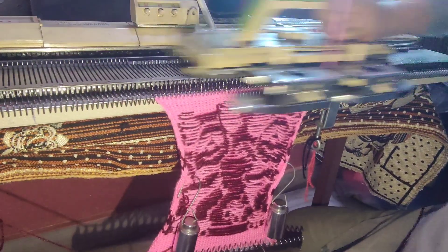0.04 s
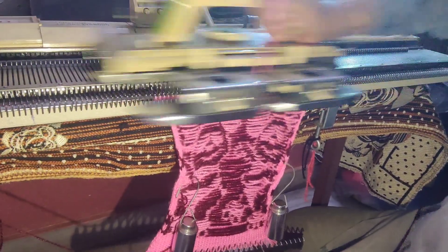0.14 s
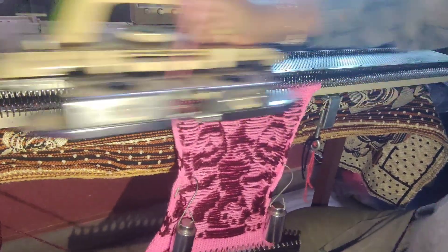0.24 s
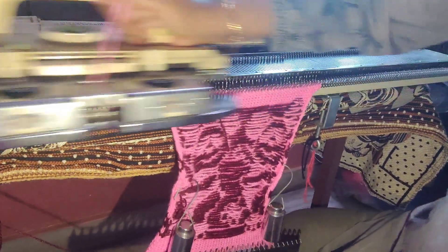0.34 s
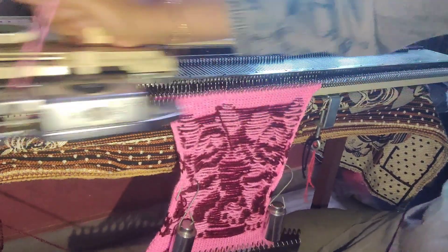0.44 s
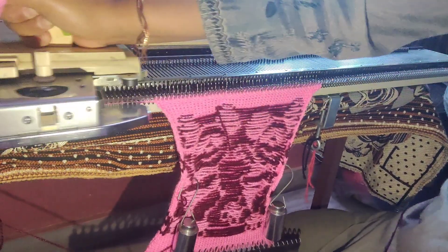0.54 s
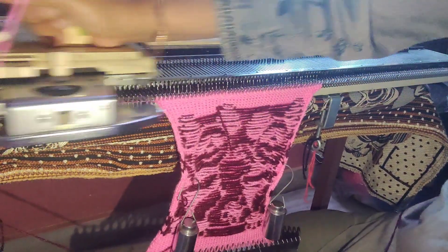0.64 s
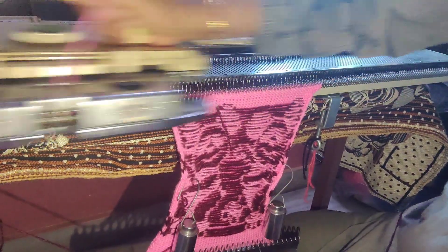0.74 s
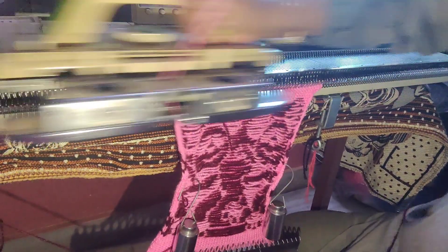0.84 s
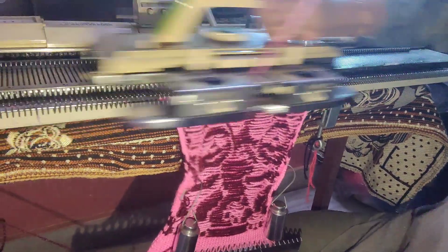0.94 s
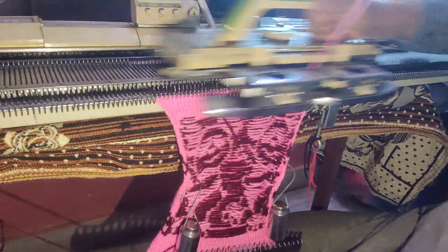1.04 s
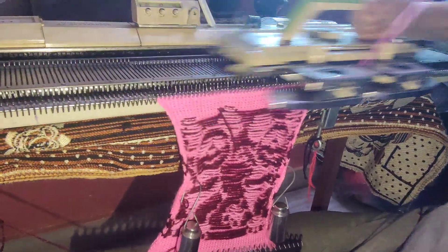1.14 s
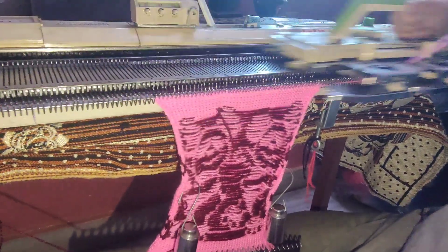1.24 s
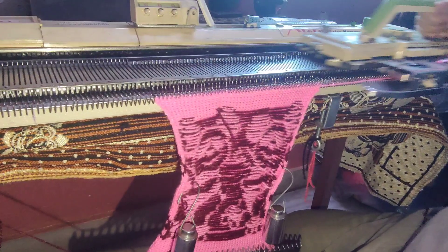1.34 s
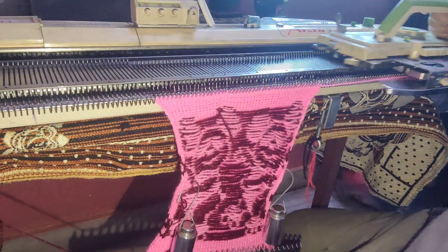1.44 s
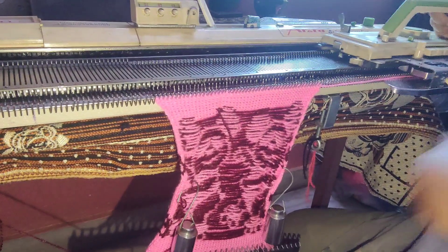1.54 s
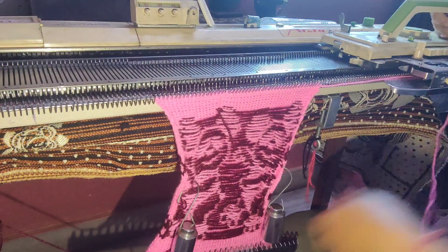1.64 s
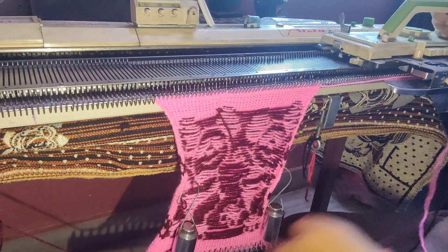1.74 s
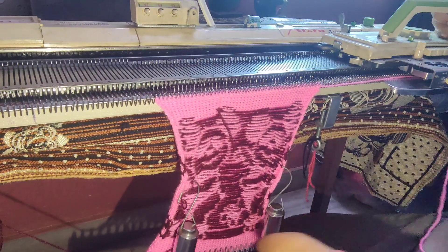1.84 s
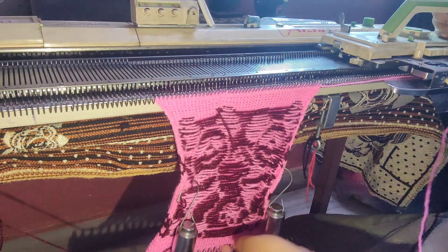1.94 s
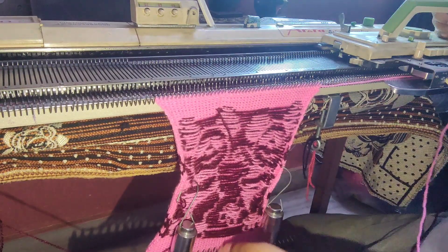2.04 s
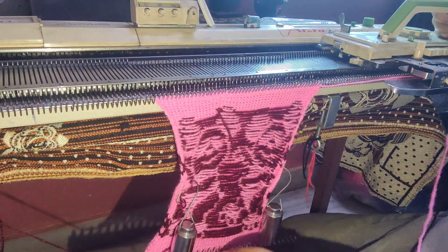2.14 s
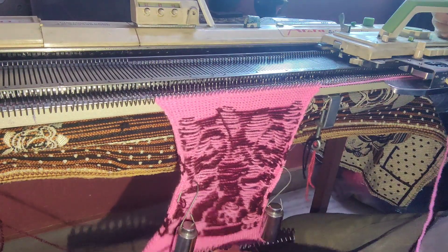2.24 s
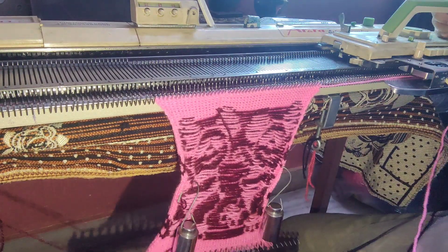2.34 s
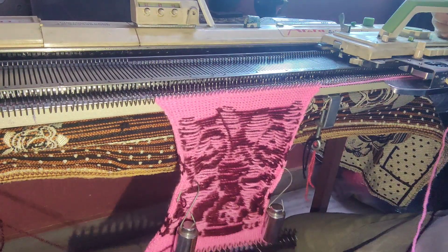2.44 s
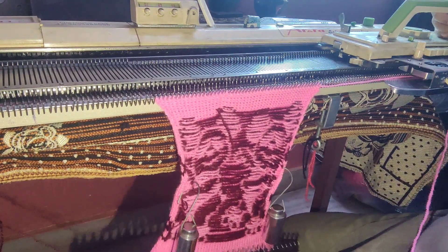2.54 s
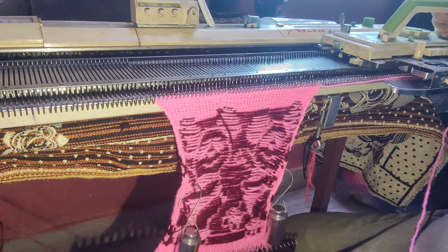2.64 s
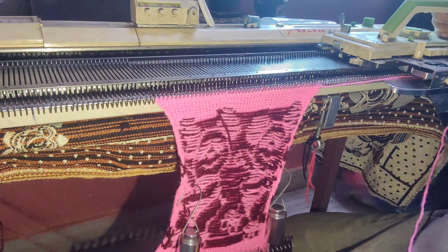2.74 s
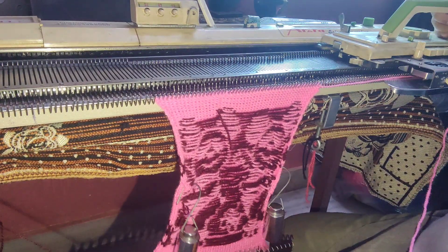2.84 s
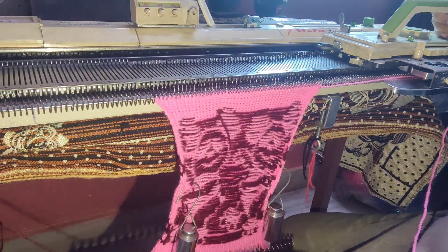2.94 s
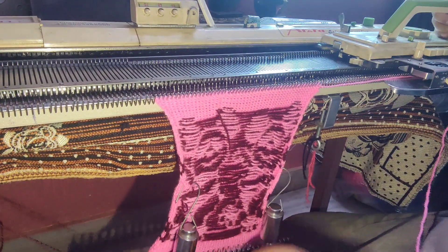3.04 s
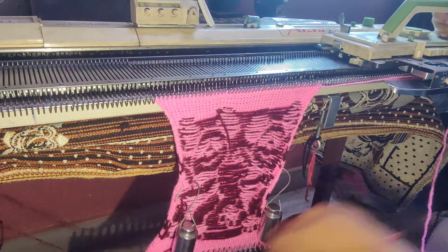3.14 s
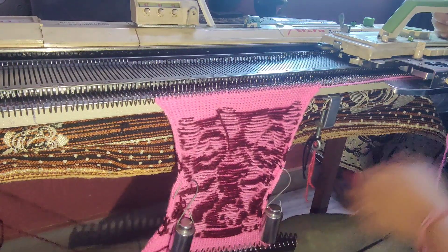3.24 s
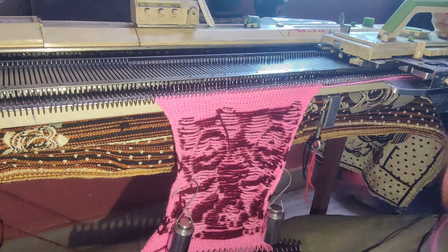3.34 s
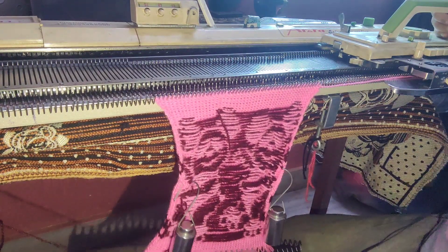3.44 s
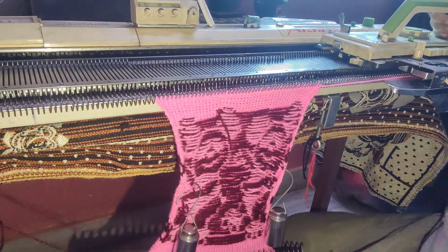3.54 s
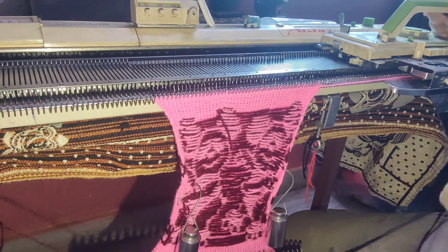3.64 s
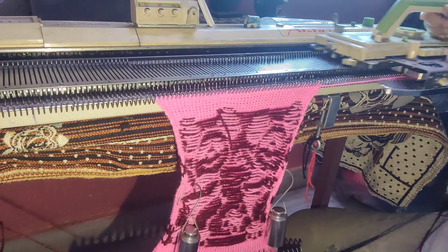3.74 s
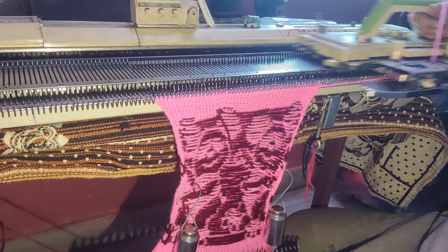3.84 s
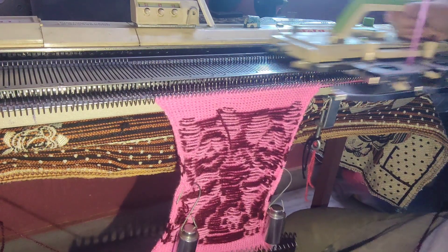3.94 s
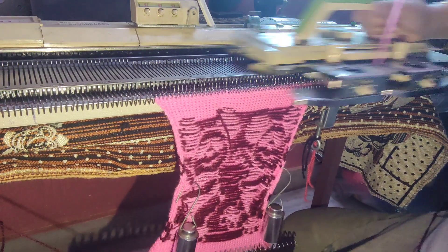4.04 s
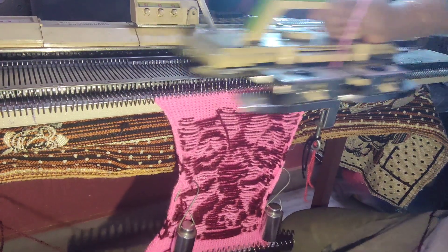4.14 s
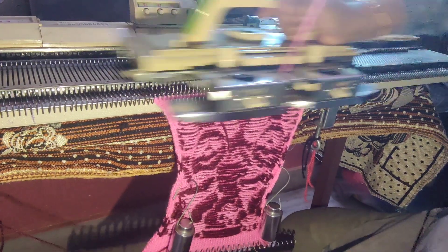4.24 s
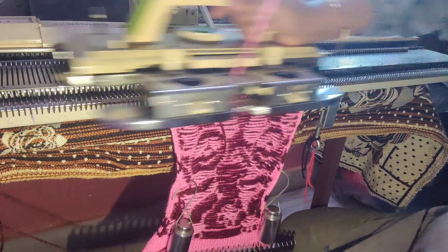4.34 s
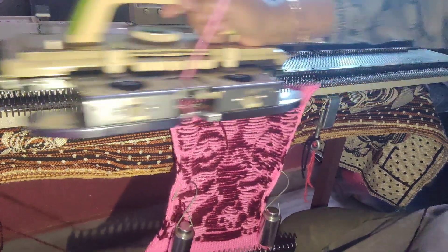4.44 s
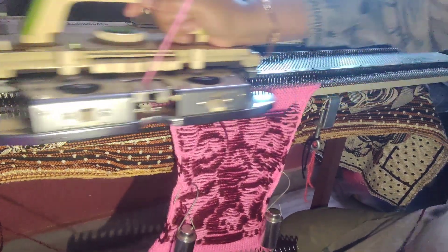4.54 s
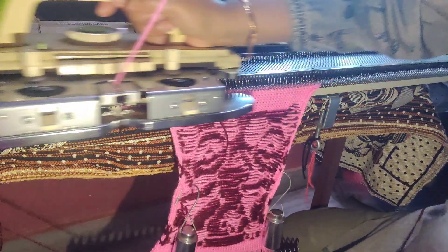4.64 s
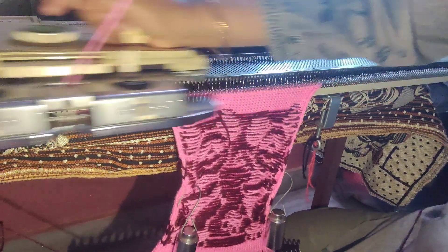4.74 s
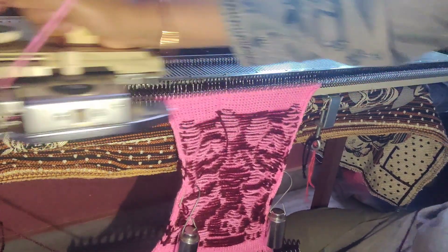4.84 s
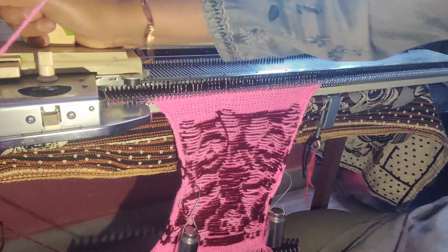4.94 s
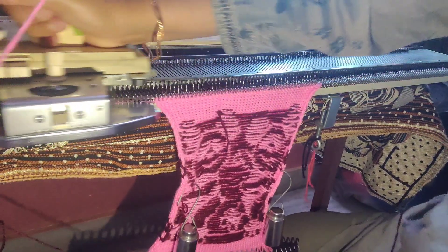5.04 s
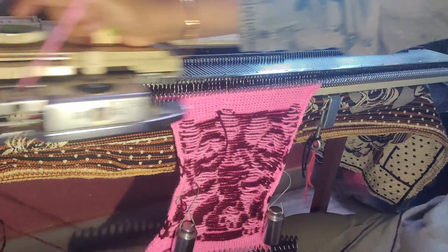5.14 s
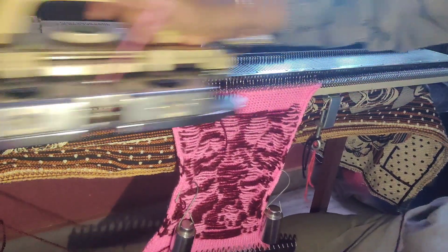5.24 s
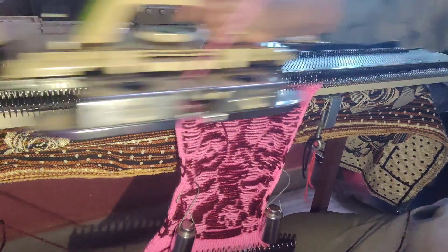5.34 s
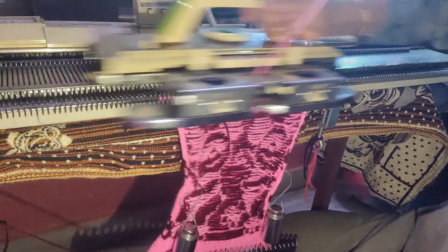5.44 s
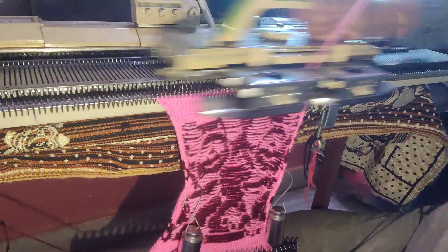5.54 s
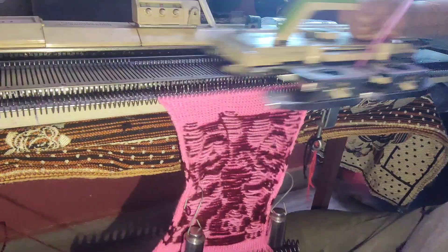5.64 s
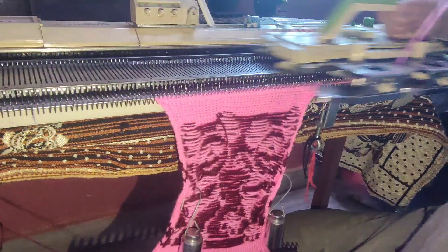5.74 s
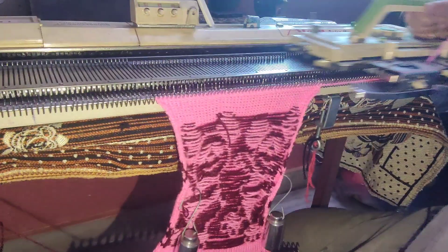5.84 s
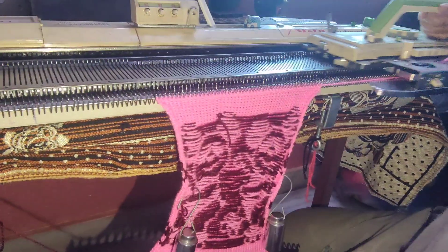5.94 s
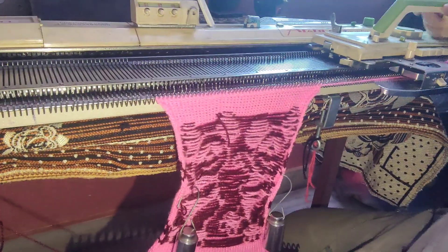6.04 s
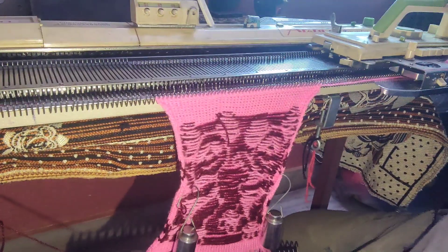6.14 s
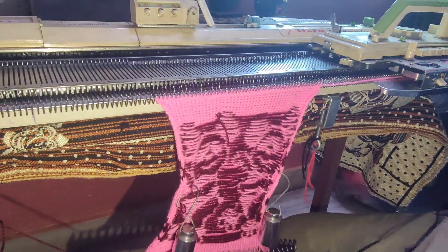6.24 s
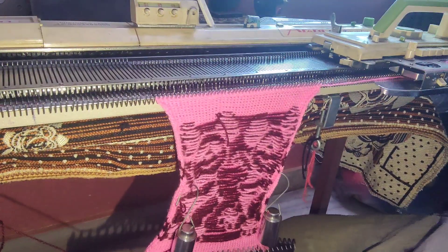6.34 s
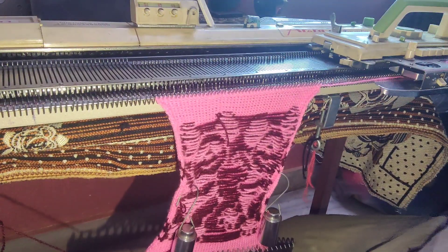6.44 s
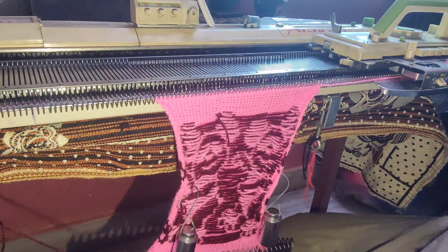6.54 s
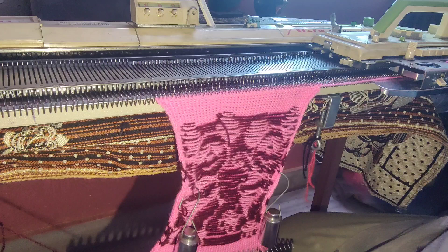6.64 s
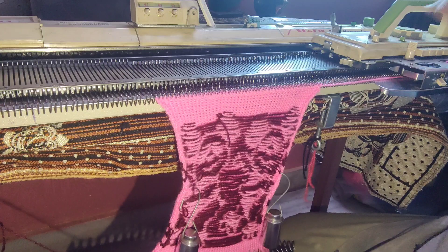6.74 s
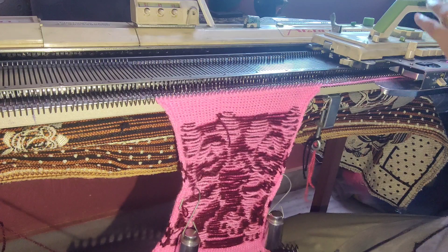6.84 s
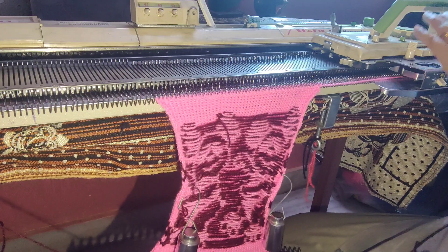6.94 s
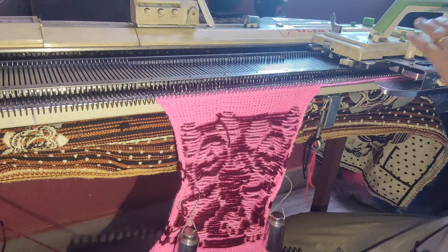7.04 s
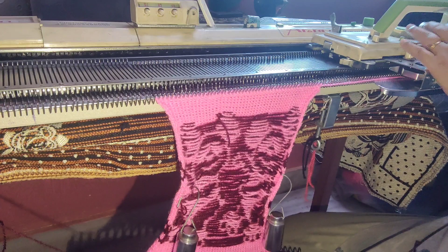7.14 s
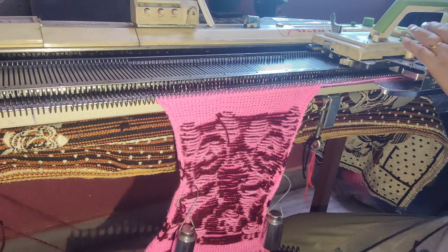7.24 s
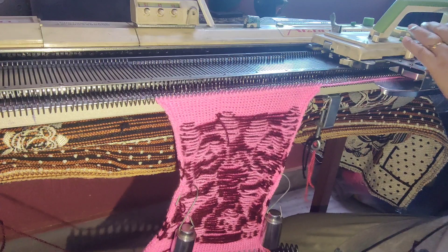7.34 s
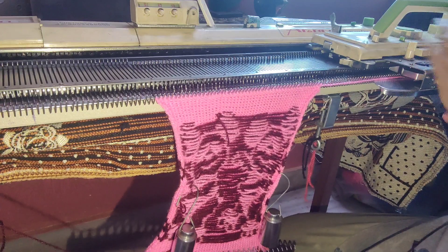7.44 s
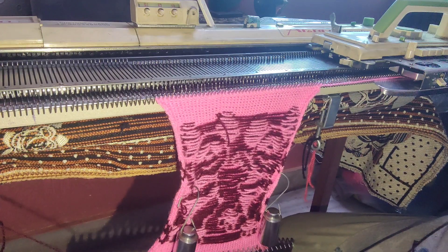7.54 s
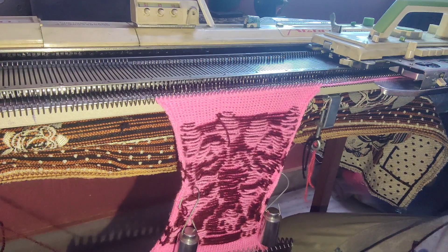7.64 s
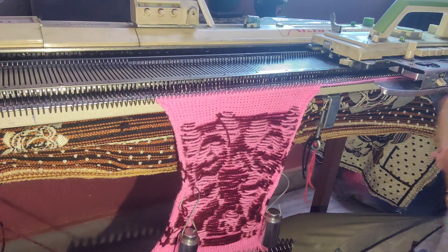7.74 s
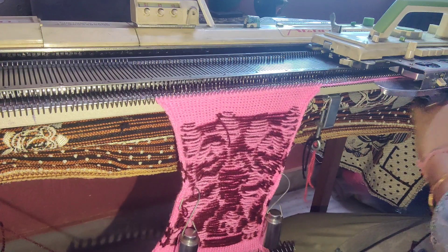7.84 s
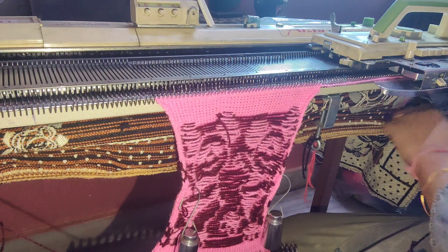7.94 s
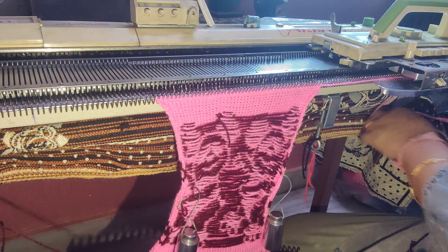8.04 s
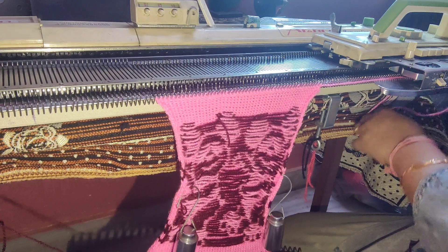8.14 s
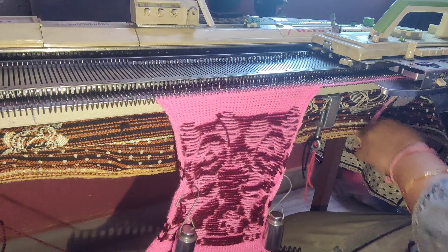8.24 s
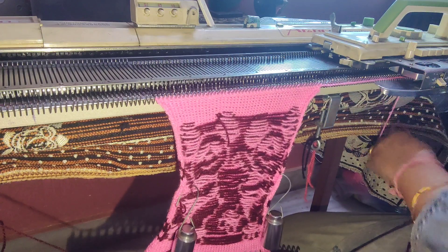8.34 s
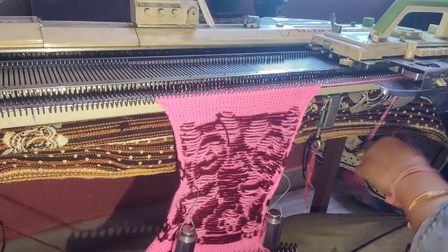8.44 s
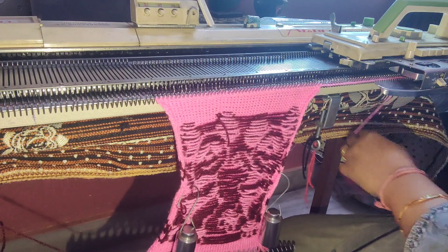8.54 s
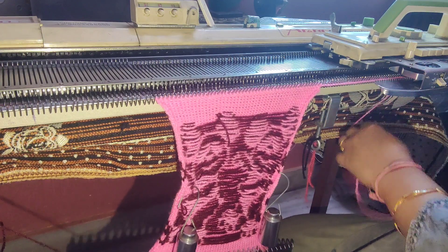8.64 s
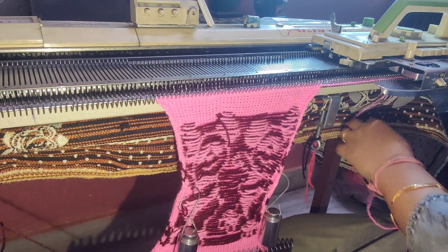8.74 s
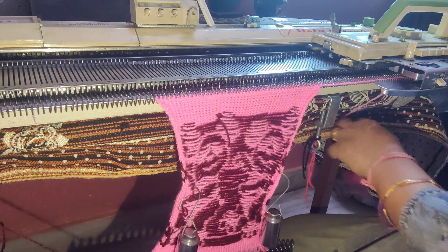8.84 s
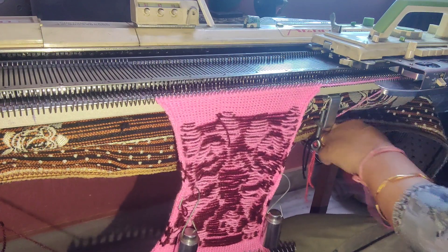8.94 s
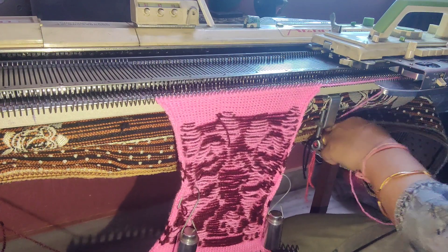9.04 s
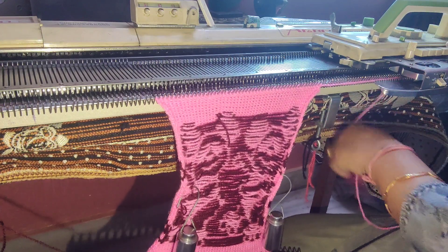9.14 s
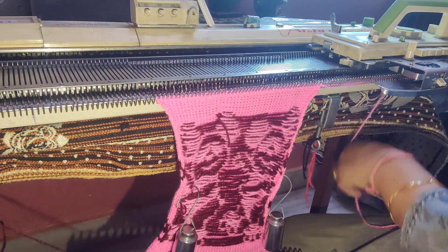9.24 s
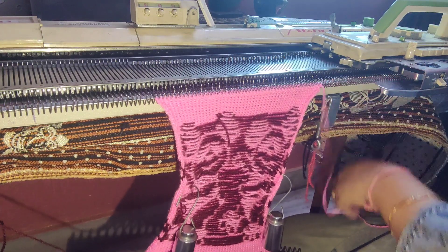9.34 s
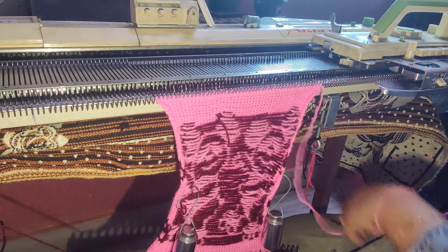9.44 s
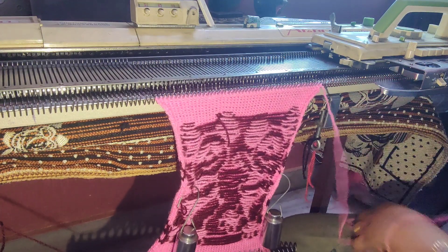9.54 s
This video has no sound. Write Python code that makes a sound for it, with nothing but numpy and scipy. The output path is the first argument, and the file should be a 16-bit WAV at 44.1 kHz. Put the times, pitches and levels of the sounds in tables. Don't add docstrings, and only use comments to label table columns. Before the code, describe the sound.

Close, dry metallic whirrs of a hand-pushed knitting machine sweep over and back, pause, repeat with clicks and tiny squeaks, followed by two sharp lever snaps.

```python
import sys
import numpy as np
from scipy import signal
from scipy.io import wavfile
from scipy.ndimage import uniform_filter1d

SR = 44100
rng = np.random.default_rng(int(sys.argv[2]) if len(sys.argv) > 2 else 0)


def master_out(mix):
    frames = np.transpose(np.atleast_2d(mix))
    ceiling = np.clip(frames, -1, 1)
    pcm = np.round(ceiling * 32767).astype(np.int16)
    wavfile.write(sys.argv[1], SR, pcm)


def voltage_ratio(decibels):
    exponent = np.asarray(decibels, float) / 20
    return 10 ** exponent


N = 422478
HZ = np.fft.rfftfreq(8192, 1 / SR)
CLICK_MS = 2.8

# (frequency [Hz], width [Hz], level [dB])
CASE_MODES = [(60, 68, -3.5), (142, 19, 8.5), (407, 81, -3), (630, 31, -0.5), (1070, 800, -11)]


def evened(x):
    return x / np.sqrt(np.mean(x ** 2) + 1e-20)


def read(points, hz):
    f, value = np.transpose(points)
    return np.interp(np.log(hz + 1), np.log(f + 1), value)


def add(mix, s, sound):
    part = mix[round(s * SR):][:len(sound)]
    part += sound[:len(part)]


def bumps(peaks, hz):
    return sum(voltage_ratio(db) ** 2 / (1 + (2 * (hz - f) / width) ** 2) for f, width, db in peaks)


def dips(valleys, hz):
    return np.prod([1 - depth * np.exp(-((hz - f) / width) ** 2) for f, width, depth in valleys], axis=0)


def causal(gain):
    log_gain = np.log(np.maximum(np.r_[gain, gain[-2:0:-1]], 1e-5))
    return np.fft.ifft(np.exp(np.conj(signal.hilbert(log_gain)))).real[:len(gain) // 2]


def coloured(x, gain):
    return signal.oaconvolve(x, causal(gain))[:len(x)]


def band(x, lo_hz, hi_hz):
    return signal.sosfilt(signal.butter(8, [lo_hz, hi_hz], "bandpass", fs=SR, output="sos"), x)


def ring(modes, fuzz):
    t = np.arange(round(0.4 * SR)) / SR
    drift = evened(uniform_filter1d(rng.standard_normal((len(modes), len(t))), 300))
    waver = (1 + fuzz * drift) * (1 - np.exp(-t / 0.00069))
    return sum(w * voltage_ratio(db - 60 * t / t60) * np.sin(2 * np.pi * f * t)
               for (f, db, t60), w in zip(modes, waver))


def crack(envelope, gain):
    sound = signal.oaconvolve(envelope * rng.standard_normal(len(envelope)), causal(gain)[:2048])
    return sound / abs(sound).max()


def click(t, low_db, top_db, hz, ms):
    blow = (1 - np.exp(-t / 0.00083)) * np.exp(-1000 * t / ms)
    centre = crack(blow, bumps([(hz, 2600, 0)], HZ) / (1 + (HZ / 7900) ** 16))
    body_gain = np.sqrt(bumps([(2300, 1800, -0.5), (3760, 760, -4.0)], HZ))
    body = crack(blow, body_gain / (1 + (1100 / (HZ + 1)) ** 4))
    top = crack(blow ** 2, 1 / (1 + (8000 / (HZ + 1)) ** 16) / (1 + (HZ / 13000) ** 4))
    return centre + voltage_ratio(low_db + 1.0) * body + voltage_ratio(top_db + 2.5) * top


def levels(*laws):
    # (time [s], speed of needle knocks [dB], hand weight on the bed [dB])
    strokes = [
        [(0.0, -58, 1), (0.048, -56, -1), (0.082, -39, -3.5), (0.112, -32, 1.5), (0.218, -23, -3.5),
         (0.35, -25.5, 1), (0.465, -38.5, 6.5), (0.554, -54, 5.5), (0.62, -58, 2.5)],
        [(0.886, -42, -1), (0.926, -30.5, 3), (0.97, -24.5, -1.5), (1.04, -25.5, 1), (1.232, -31.5, 1),
         (1.3, -41.5, 3), (1.384, -52, 0.5), (1.594, -73.5, 1), (1.75, -95.5, 8.5)],
        [(4.164, -54.5, 6), (4.185, -34, -4), (4.224, -29.5, 1), (4.298, -25, -3.5), (4.39, -28.5, 1),
         (4.528, -31.5, 2.5), (4.62, -35.5, 3), (4.714, -42.5, 5.5), (4.79, -52, 8.5)],
        [(5.337, -43, -4.5), (5.382, -33.5, 0), (5.468, -26.5, -1), (5.515, -29.5, 2), (5.584, -27, 0),
         (5.678, -27, -0.5), (5.79, -39.5, 6), (5.96, -60, -0.5), (6.25, -93, 7)],
    ]
    # (time [s], speed [dB], hand weight [dB])
    turns = [
        [(0.72, -68, 2.5), (0.872, -57.5, -2)],
        [(3.78, -91.5, 1), (3.81, -85.5, -1.5), (3.826, -68, 5), (3.976, -63.5, 1), (4.138, -57, -2)],
        [(4.858, -52, 2), (4.99, -58, 0), (5.118, -64.5, 1), (5.29, -59, -2.5), (5.33, -56.5, -1)],
    ]
    full_speed_db = -25
    s, speed_db, weight_db = np.array(sorted(row for path in strokes + turns for row in path)).T
    t = np.arange(N) / SR
    resting = np.r_[np.diff(s) > 1, True][np.searchsorted(s, t, "right") - 1]
    speed_db = np.interp(t, s, speed_db) - full_speed_db
    weight_db = np.interp(t, s, weight_db)
    return [~resting * voltage_ratio(db + by_speed * speed_db + by_weight * weight_db)
            for db, by_speed, by_weight in laws]


def patchy(x):
    z = signal.stft(x, nperseg=512)[2]
    patches = rng.standard_normal(z.shape[::-1]).T
    patches = uniform_filter1d(uniform_filter1d(patches, size=5, axis=0), size=12, axis=1)
    patch_db = 1.4 * evened(patches)
    return signal.istft(z * voltage_ratio(patch_db), nperseg=512)[1][:N]


def needle_knocks():
    # (time [s], level [dB])
    surges = [(0.122, -0.9), (0.141, -1.1), (0.213, 1.2), (0.341, -1.5), (0.366, 1.94), (0.379, -2),
              (0.416, -0.15), (0.941, -0.7), (1.013, 0), (1.055, 1.2), (1.079, -1.3), (1.118, -1.6),
              (1.18, 0.5), (1.256, 0.04), (4.307, 1.1), (4.437, -0.9), (5.445, -0.55), (5.469, 0.6),
              (5.519, -1.6), (5.644, -1.76), (5.675, 1.03), (5.701, -2), (5.748, -0.26)]
    knocks_per_s, surge_s = 5000, 0.009
    impacts = rng.choice([-1., 1.], N) * (rng.random(N) < knocks_per_s / SR)
    knocks = evened(impacts) + 0.7 * rng.standard_normal(N)
    knocks *= voltage_ratio(0.3 * evened(uniform_filter1d(rng.standard_normal(N), 500)))
    near = np.arange(-1000, 1000)
    for s, db in surges:
        knocks[round(s * SR) + near] *= voltage_ratio(1.3 * db * np.exp(-(near / SR / surge_s) ** 2))
    return knocks


def carriage():
    # (start [s], [(frequency [Hz], width [Hz], level [dB])])
    bed_modes = [
        (0, [(450, 40, -1), (654, 81, -4), (940, 33, -9), (1133, 28, -0.5), (1950, 100, -8.5), (1512, 32, -1.5), (2355, 150, -1), (3000, 300, -9), (3520, 470, -6), (4030, 60, -1.5), (4500, 68, -7)]),
        (.8, [(561, 150, -10), (1094, 72, -1.5), (1237, 70, -7), (2950, 150, -8.5), (3927, 300, -8.5), (1509, 59, -4.5), (2388, 110, 0.5), (3430, 130, 0), (4480, 110, -8)]),
        (3.001, [(329, 39.4, -13.5), (443.2, 50, -5.5), (562.5, 110, -3.5), (845, 60, -6.5), (1175, 130, -2.5), (3030, 300, -7), (3900, 300, -5.5), (4700, 300, -8.5), (1521, 52, -0.5), (2014, 75, -4.5), (2425, 120, -3), (3472, 260, -2), (4383, 49, -3.5)]),
        (5.201, [(490, 80, -9), (631, 117, -5), (2020, 142, -7), (1150, 186, -5), (1540, 68, -5), (2460, 250, -2), (3430, 155, 0), (4000, 109, -1.5), (4450, 94, -6)]),
    ]
    # (frequency [Hz], density [dB per Hz])
    rasp = [(120, -39.5), (200, -6.5), (286, -15), (497, 0), (762, -11), (1140, 0), (1380, -8),
            (1520, -4.5), (1700, -3), (2360, -6), (5400, -6), (7020, -36), (11900, -120)]
    # (frequency [Hz], density [dB per Hz])
    sheen = [(2350, -39), (4000, -6), (5130, -10.5), (6250, 1.5), (6510, 3.5), (7400, -3.5), (8070, -11.5),
             (12500, -17), (15200, -20.5), (15700, -18)]
    # (frequency [Hz], width [Hz], depth [0-1])
    valleys = [(1390, 58, .65), (1700, 170, 0.7), (5000, 300, .1)]
    knocks = needle_knocks()
    base = voltage_ratio(read(rasp, HZ) - 4.5) ** 2
    strokes = np.split(knocks, [round(s * SR) for s, _ in bed_modes[1:]])
    bed = np.concatenate([evened(coloured(stroke, np.sqrt(bumps(peaks, HZ) + base)))
                          for stroke, (_, peaks) in zip(strokes, bed_modes)])
    steel = patchy(coloured(knocks * rng.choice([-1., 1.], N), voltage_ratio(read(sheen, HZ))))

    singing = np.minimum(levels((0, 0.2, 0))[0], 1)
    bed = singing * bed + (1 - singing) * evened(coloured(knocks, np.sqrt(base)))
    bed = patchy(coloured(bed, dips(valleys, HZ)))

    parts = [band(steel, 4900, 7900), band(steel, 7900, 17000), band(bed, 800, 5000), band(bed, 240, 800)]
    gains = levels((-26, 1, 0), (-30, 1.24, 0.58), (-29, 0.9, 0.88), (-39.5, 0.73, 1.2))
    return sum(gain * evened(part) for gain, part in zip(gains, parts))


def table_boom():
    # (frequency [Hz], width [Hz], level [dB])
    table_modes = [(134.4, 11, -3), (162, 9.8, 0), (196.1, 38, -10.5)]
    # (time [s], boom [dB], rocking [dB])
    jolts = [(0.07, -49, -74), (0.23, -50, -76), (0.47, -43, -66), (1.06, -46.5, -73), (1.28, -47, -63),
             (3.85, -62, -64), (4.25, -44.5, -69), (4.4, -46, -52), (4.54, -47, -47), (4.65, -46.5, -49),
             (4.81, -43, -60), (4.96, -64, -67), (5.06, -61.5, -80), (5.18, -58.5, -67), (5.369, -50, -84),
             (5.48, -58, -60), (5.6, -39, -74), (5.77, -41.5, -59)]
    rise_db_per_s, fall_db_per_s = 199.5, 109.5
    rocking_modes = [(62.5, 14, -0.29), (101, 44, -1.7)]
    boom = coloured(rng.standard_normal(N), bumps(table_modes, HZ) ** 0.75)
    rocking = coloured(rng.standard_normal(N), bumps(rocking_modes, HZ))
    gains = np.array(levels((-50, 0.45, 0.51), (-72, 0.43, 0.5)))
    t = np.arange(-SR // 2, SR) / SR
    jolt = voltage_ratio(np.minimum(rise_db_per_s * t, -fall_db_per_s * t))
    shaken = np.zeros((2, N + SR // 2))
    for s, *dbs in jolts:
        for row, db in zip(shaken, dbs):
            add(row, s, (voltage_ratio(db) * jolt) ** 2)
    gains = np.sqrt(gains ** 2 + shaken[:, SR // 2:])
    return gains[0] * evened(boom) + gains[1] * evened(rocking)


def moans():
    # (time [s], length [s], frequency [Hz], level [dB])
    notes_held = [
        (4.165, 0.18, 172, -33),
        (0.2, .07, 220, -46),
        (5.57, 0.13, 130, -42.5),
        (0.03, .11, 165, -40),
        (4.3, 0.03, 183, -51),
        (4.7, .035, 160, -59),
    ]
    out = np.zeros(N)
    for s, length, hz, db in notes_held:
        t = np.arange(round(length * SR)) / SR
        swell = np.sin(np.pi * (t / length) ** 1.5)
        add(out, s, voltage_ratio(db) * swell * np.sin(2 * np.pi * hz * t))
    return out


def cam_clicks():
    # (time [s], peak [dB], low part [dB], top part [dB], pitch [Hz])
    strikes = [(0.072, -43.5, -12, 0, 7000), (0.0823, -35, -10.5, -7.5, 6340),
               (0.4737, -19.5, -21.5, -12, 6860), (0.5677, -32.5, -5, -9, 6360),
               (0.609, -41.5, -9.5, -10, 6900), (0.629, -46, -1, -10, 6700), (0.8814, -34, -0.5, -15, 7140),
               (0.906, -33, -1, -10.5, 6460), (1.2813, -21, -5.5, -7, 6900), (3.8295, -59.5, 2, -21, 5640),
               (4.172, -24, -15, -12, 6370), (4.583, -21.5, -13, -5, 6600), (5.3357, -40.5, 1, -5, 7640),
               (5.3436, -38.5, -1.5, -20, 7350), (5.6797, -18.5, -10, -14.5, 6150),
               (5.7903, -23, -13, -5, 7300)]
    out, t = np.zeros(N), np.arange(1500) / SR
    for s, db, low_db, top_db, hz in strikes:
        add(out, s, voltage_ratio(db + 1.0) * click(t, low_db, top_db, hz, CLICK_MS))
    return out


def scuffs():
    # (time [s], peak [dB], pitch [Hz], duration [ms], width [Hz])
    catches = [
        (0.472, -22.5, 6900, 4, 1588),
        (3.829, -53, 5570, 5, 900),
        (3.954, -52.5, 6700, 6, 1500),
        (3.959, -42, 6700, 6.01, 900),
        (4.096, -43.5, 6800, 5, 899),
        (5.2274, -47, 5990, 3, 3000),
        (5.3375, -39.5, 7180, 7, 2000),
        (5.6727, -17, 6500, 7, 1800),
        (1.051, -18.5, 6500, 6, 2026),
    ]
    out, t = np.zeros(N), np.arange(1500) / SR
    for s, db, hz, ms, width in catches:
        gain = bumps([(hz, width, 0), (2400, 1500, -12), (11000, 6000, -24)], HZ)
        add(out, s, voltage_ratio(db) * crack(t * np.exp(-2000 * t / ms), gain))
    return out


def latches():
    # (time [s], peak [dB], pitch [Hz], plate ring [dB], latch ring [dB])
    drops = [
        (4.8248, -21, 7600, -59, -25.5),
        (4.9638, -28, 6200, -42.5, -27),
        (5.0516, -31, 6300, -48.5, -32),
        (5.168, -39.5, 6620, -53.5, -37),
    ]
    # (frequency [Hz], width [Hz], level [dB])
    latch_modes = [
        [(2270, 190, -9), (3180, 290, -9), (3690, 140, -14), (5200, 190, -14), (5670, 120, -10), (6490, 150, 2),
         (7700, 230, 4), (9900, 290, -11)],
        [(1154, 270, -6), (2430, 110, -2), (3226, 110, -2), (4700, 190, -11), (5560, 200, -2), (6200, 100, 0),
         (7180, 180, -10), (8200, 310, -11)],
        [(2403, 130, -2.5), (3270, 120, -1), (3720, 110, -8), (4550, 280, -8), (6050, 280, -3),
         (9200, 130, -14), (10600, 240, -13), (11620, 210, -15)],
        [(1150, 170, -10), (2400, 95, -3), (3220, 170, -4), (4870, 300, -12), (5490, 160, 1), (6480, 180, 3),
         (8100, 110, -12), (8970, 230, -3)],
    ]
    # (frequency [Hz], level [dB], t60 [s])
    plate_modes = [(1130, -10, 0.13), (1223, -3, 0.12), (1515, -5, .12), (2010, -1.5, 0.13),
                   (2182, -5.5, .09), (2320, -3.5, 0.1), (2530, -6.5, .11), (3265, -12.5, .06),
                   (3526, -11, 0.061), (5730, -4.5, .12)]
    # (frequency [Hz], level [dB], t60 [s])
    spring_modes = [(4495, -16.5, .7)]
    out, t = np.zeros(N), np.arange(1500) / SR
    for (s, db, hz, plate_db, latch_db), body in zip(drops, latch_modes):
        add(out, s + 0.0005, voltage_ratio(db + 1.5) * click(t, -9.0, -8.5, hz, ms=2))
        modes = [(f, level_db, 2.1 / width) for f, width, level_db in body]
        add(out, s, voltage_ratio(latch_db) * ring(modes, 0.15))
        contact = crack(np.exp(-t / 0.006), bumps([(2500, 1200, 0), (5700, 1500, 0.0003)], HZ))
        add(out, s + 0.001, voltage_ratio(latch_db - 6) * contact)
        add(out, s, voltage_ratio(plate_db) * (ring(plate_modes, 1.2) + ring(spring_modes, 0.25)))
    return out


def squeaks(count=10):
    first_s, gap_s, slowing_s, stray_s = 4.624, 0.014, 0.0011, 4.572
    pitch_hz, sink_hz = 12200, 70
    level_db, fade_db, tick_db = -32, -1.0, -6
    out, t, k = np.zeros(N), np.arange(900) / SR, np.arange(count)
    times = np.r_[stray_s, first_s + k * gap_s + k * (k - 1) / 2 * slowing_s]
    envelope = (1 - np.exp(-t / 0.00083)) * np.exp(-1000 * t / 3)
    for n, (s, (size, tune)) in enumerate(zip(times, rng.standard_normal((count + 1, 2)))):
        hz = (pitch_hz - n * sink_hz + 220 * tune) * (1 + 0.12 * np.exp(-t / 0.002))
        squeak = np.sin(2 * np.pi * np.cumsum(hz) / SR) * envelope
        tick = voltage_ratio(tick_db) * click(t, 0, 3, 7100, CLICK_MS)[:len(t)]
        add(out, s, voltage_ratio(level_db + n * fade_db + 2.2 * size) * (squeak + tick))
    return out


def fingers():
    # (time [s], peak [dB], top part [dB])
    finger_ticks = [
        (4.932, -54, -9),
        (7.396, -63, -30.5),
        (9.249, -70.5, -11),
        (9.259, -66, -12),
        (9.279, -60, -13),
    ]
    # (time [s], peak [dB], pitch [Hz])
    nail_taps = [
        (8.1415, -53, 6400),
        (8.339, -54, 5600),
    ]
    out, t = np.zeros(N), np.arange(1500) / SR
    for s, db, top_db in finger_ticks:
        add(out, s, voltage_ratio(db) * click(t, -5, top_db, 6900, ms=5.3))
    tail_gain = bumps([(6700, 1400, 0), (4100, 900, -1), (2200, 1200, 0)], HZ)
    for s, db, hz in nail_taps:
        gain = bumps([(hz, 2200, 0), (3900, 900, -2), (2400, 900, -1.5)], HZ) ** 1.4 + 0.018
        add(out, s, voltage_ratio(db) * crack(t * np.exp(-t / 0.0012), gain))
        add(out, s + 0.002, voltage_ratio(db - 8) * crack(np.exp(-t / 0.02) * (1 - t / t[-1]), tail_gain))
    return out


def snaps():
    # (time [s], peak [dB], thud [dB], rattle [dB], rattle length [ms])
    lever_snaps = [
        (7.405, -23, -20.5, -5, 34),
        (9.285, -21.5, -26, -11, 46),
    ]
    # (frequency [Hz], density [dB per Hz])
    colours = [
        [(800, -43), (1600, -12), (1900, -11), (2500, -4), (4300, -8), (5400, -3.5), (7700, -5), (8100, -17),
         (10000, -11), (12000, -19), (16000, -21)],
        [(800, -47), (1400, -17.5), (3300, -11.5), (3900, -2), (4700, -8.5), (5500, -3.5), (7600, -0.5),
         (9000, -5), (10500, -13), (16000, -19.5)],
    ]
    # (delay [ms], size [ratio], top part [dB])
    snap_ticks = [
        [(0, 0.28, -20.5), (1.0, 0.5, -22), (1.89, 0.93, -24), (2.86, 0.9, -23), (4.28, 0.91, -21),
         (26, .45, -23.5)],
        [(0, .15, -27), (1.3, 0.96, -17), (3.8, 0.77, -26)],
    ]
    # (frequency [Hz], width [Hz], level [dB])
    lever_modes = [(5570, 240, 2), (6540, 200, 1), (7500, 250, 4), (10110, 300, -3)]
    out, t = np.zeros(N), np.arange(14000) / SR
    for (s, db, thud_db, rattle_db, ms), colour, ticks in zip(lever_snaps, colours, snap_ticks):
        gain = voltage_ratio(read(colour, HZ)) * np.sqrt(1 + bumps(lever_modes, HZ))
        for delay_ms, size, top_db in ticks:
            tick_gain = bumps([(6800, 2600, 0)], HZ) ** 1.3
            tick_gain = tick_gain + voltage_ratio(top_db) * bumps([(12000, 2800, 0.5), (4000, 700, -1)], HZ)
            tick = crack(np.exp(-t[:400] / 0.00025), tick_gain)
            add(out, s + delay_ms / 1000, voltage_ratio(db) * size * tick)
        shake = voltage_ratio(2.35 * evened(uniform_filter1d(rng.standard_normal(len(t)), 80)))
        held = np.exp(-np.maximum(t - ms / 1000, 0) / 0.017) * np.exp(-t / 0.1)
        rattle = crack(shake * (1 - np.exp(-t / 0.0013)) * held, gain)
        add(out, s + 0.0013, voltage_ratio(db + rattle_db) * rattle)
        settling = voltage_ratio(-15.5) * np.exp(-t / 0.092)
        trail = crack(shake, gain * (0.15 + bumps([(6600, 2800, 0.0011)], HZ)))[:len(t)]
        add(out, s + 0.002, voltage_ratio(db + rattle_db) * settling * trail)
        thud = crack((1 - np.exp(-t / 0.0011)) * np.exp(-t / 0.08), np.sqrt(bumps(CASE_MODES, HZ)))
        add(out, s + 0.0036, voltage_ratio(db + thud_db) * thud)
    return out


def bangle():
    # (time [s], peak [dB], low modes [dB])
    chinks = [
        (2.1004, -68.5, -14),
        (2.199, -51, 1),
    ]
    # (frequency [Hz], level [dB], t60 [s])
    hoop_modes = [(3430, -11, 0.1), (4600, -8, .08), (5600, -6, 0.13), (6870, -6, .08), (7321, 0.5, 0.14),
                  (7650, -3.5, 0.053), (10720, -13, 0.052), (11400, -11, .05), (12300, -9, 0.049),
                  (13370, -13, .07), (14730, -13, .09), (15400, -24, .07)]
    out, t = np.zeros(N), np.arange(6000) / SR
    scrape_gain = 1 / (1 + (6000 / (HZ + 1)) ** 2) / (1 + (HZ / 13000) ** 6)
    for s, db, low_db in chinks:
        modes = [(f, level_db + low_db * (f < 7000), t60) for f, level_db, t60 in hoop_modes]
        add(out, s - 0.005, voltage_ratio(db - 15) * ring(modes, 0.5))
        add(out, s - 0.001, voltage_ratio(db - 4.0) * ring(modes, 0.28))
        scrape = crack((1 - np.exp(-t / 0.003)) * np.exp(-t / 0.02), scrape_gain)
        add(out, s - 0.002, voltage_ratio(db - 6.0) * scrape)
        add(out, s, voltage_ratio(db - 1.0) * crack(np.exp(-t / 0.073), np.sqrt(bumps(CASE_MODES, HZ))))
    return out


def small_rings():
    # (time [s], level [dB], frequency [Hz], t60 [s])
    pings = [(8.959, -65, 2010, .05), (8.972, -73, 2100, .4), (7.408, -54, 660, .3), (7.41, -62, 1900, .2),
             (6.47, -76, 920, .3), (6.555, -72, 842, .9), (6.63, -73, 1150, .25), (6.67, -72, 660, .15),
             (6.7, -73, 1000, .2), (2.635, -72, 5600, .08), (8.347, -77, 4400, .2), (8.341, -75, 3900, .14),
             (8.97, -85, 3880, .3), (8.144, -76, 3900, .06), (8.144, -75, 2600, .05), (2.24, -72, 770, .25),
             (2.22, -74, 1150, .2), (3.36, -76, 1050, .4), (8.342, -71, 1530, .3), (8.15, -73, 1950, .2)]
    out = np.zeros(N)
    for s, db, hz, t60 in pings:
        add(out, s, ring([(hz, db, t60)], 0.35))
    return out


def hum():
    # (frequency [Hz], density [dB per Hz])
    tone = [(18, -37), (30, -16.5), (55, -5.5), (98, -8), (131, 0.5), (319, -8), (426, -1), (512, -15.5),
            (569, -5.5), (1500, -12), (1630, -20.5), (2380, -16), (2900, -21), (5590, -30), (7800, -33),
            (8200, -37), (12700, -42), (12900, -60)]
    # (frequency [Hz], width [Hz], level [dB])
    tone_modes = [(55, 34, 6.5), (150, 11, 8.5), (433, 68, 2.5), (1512, 16, 12), (1930, 150, 4),
                  (4000, 80, -0.5), (6700, 2000, 2.5)]
    # (time [s], level [dB])
    swells = [
        (2.27, 7.5),
        (3.02, 1.5),
        (6.6, 0.5),
        (7.58, 7),
        (8.2, 2),
        (8.42, 2),
        (9.44, 3),
    ]
    hum_db, swell_rise_s, swell_fall_s = -69.5, 0.089, 0.41
    frames, hz = N // 512 + 5, np.fft.rfftfreq(2048, 1 / SR)
    a, b, patches = rng.standard_normal((frames, 1025, 3)).T
    patches = evened(uniform_filter1d(uniform_filter1d(patches, 12, 0), 8, 1))
    z = (a + 1j * b) * voltage_ratio(read(tone, hz)[:, None] + 1.3 * patches)
    z = z * np.sqrt(1 + bumps(tone_modes, hz))[:, None]
    t = np.arange(N) / SR
    swelling_db = sum(db * np.exp(np.minimum((t - s) / swell_rise_s, (s - t) / swell_fall_s))
                     for s, db in swells)
    return voltage_ratio(hum_db + swelling_db) * evened(signal.istft(z, nperseg=2048, noverlap=1536)[1][:N])


def room(x):
    # (frequency [Hz], t60 [s])
    decay_times = [(250, 0.37), (700, .5), (1700, 0.36), (4000, 0.37), (6500, 0.24), (12000, 0.25)]
    taps = np.zeros(SR)
    at = np.arange(200, SR - 20, 20)
    taps[at + rng.integers(0, 20, len(at))] = rng.choice([-1., 1.], len(at))
    hz, t, z = signal.stft(taps, SR, nperseg=256)
    tail = signal.istft(z * voltage_ratio(-60 * t / read(decay_times, hz)[:, None]), SR, nperseg=256)[1]
    return signal.fftconvolve(x, tail / np.linalg.norm(tail))[:N]


def scene():
    push, levers = carriage(), snaps()
    ticks = cam_clicks() + scuffs() + latches() + squeaks() + fingers()
    metal = bangle() + small_rings()
    wet = voltage_ratio(-12.5) * push + voltage_ratio(-6.5) * ticks + voltage_ratio(-8.0) * levers + voltage_ratio(-7) * metal
    direct = voltage_ratio(0.23) * push + table_boom() + moans() + ticks + levers + metal
    mono = direct + room(wet) + hum()
    return np.array([mono, mono])


def top_cut(x):
    return signal.sosfilt(signal.butter(12, 16670, fs=SR, output="sos"), x)


def record(dry):
    # (frequency [Hz], width [Hz], depth [0-1])
    port_dip = [(7880, 130, .85)]
    cut = signal.sosfilt(signal.butter(2, 45, "highpass", fs=SR, output="sos"), dry)
    ported = signal.oaconvolve(cut, causal(dips(port_dip, HZ))[None], axes=1)[:, :N]
    wall = signal.firwin(1023, 15790, window=("kaiser", 9), fs=SR)
    leak = voltage_ratio(-42) * signal.firwin(1023, [15790, 16600], pass_zero=False, fs=SR)
    limited = signal.oaconvolve(ported, (wall + leak)[None], "same")
    return top_cut(limited)


dry = scene()
out = record(dry)
master_out(out)
```